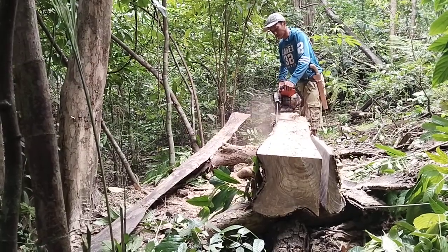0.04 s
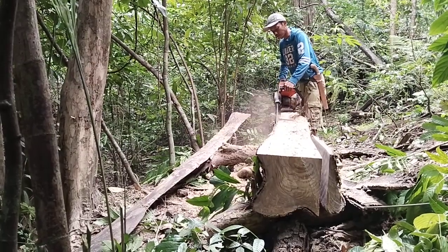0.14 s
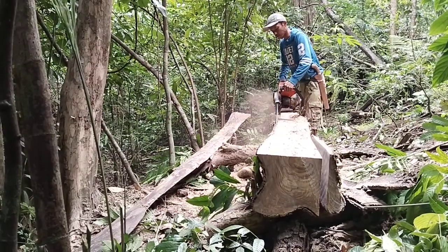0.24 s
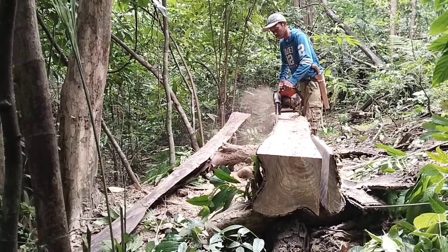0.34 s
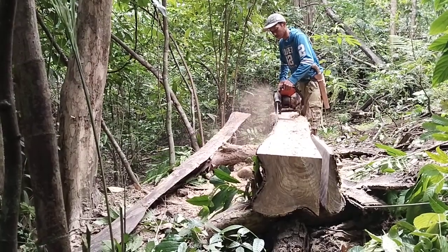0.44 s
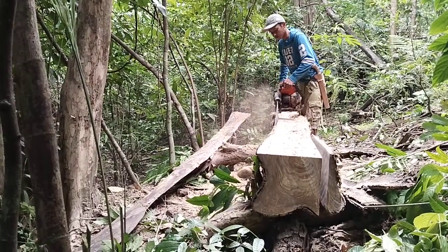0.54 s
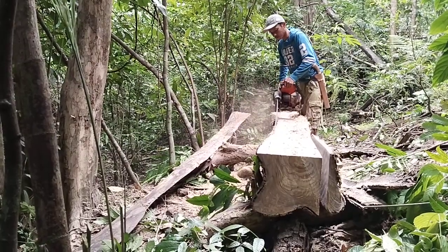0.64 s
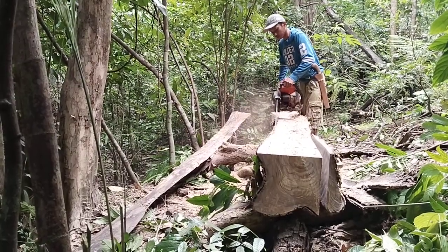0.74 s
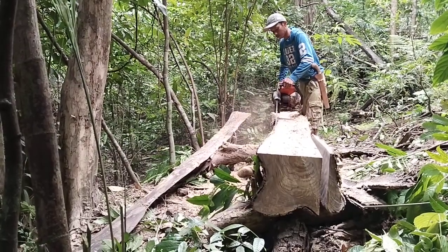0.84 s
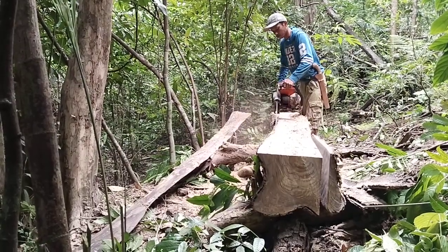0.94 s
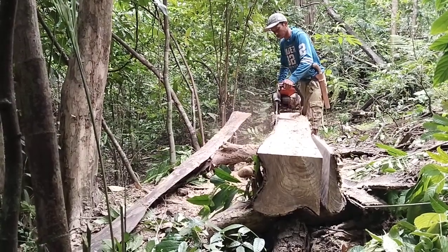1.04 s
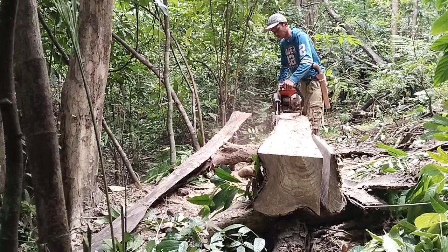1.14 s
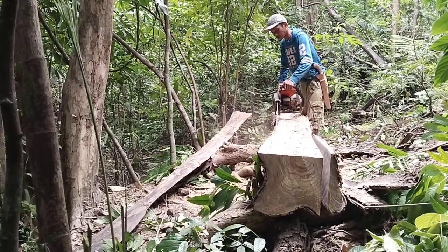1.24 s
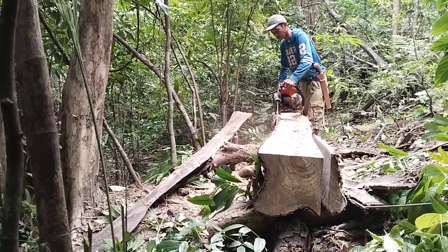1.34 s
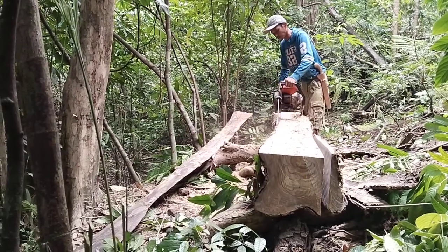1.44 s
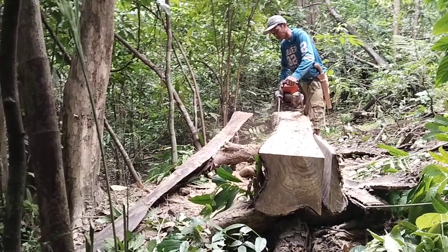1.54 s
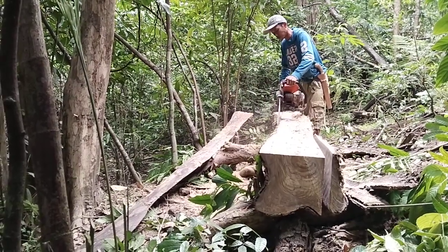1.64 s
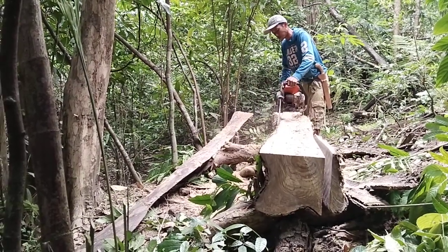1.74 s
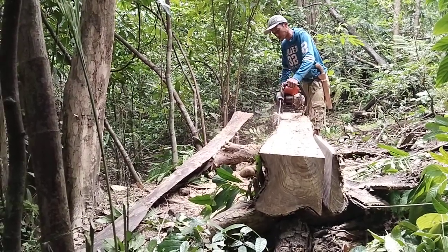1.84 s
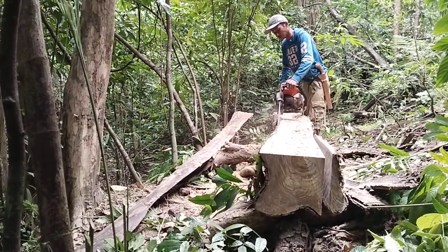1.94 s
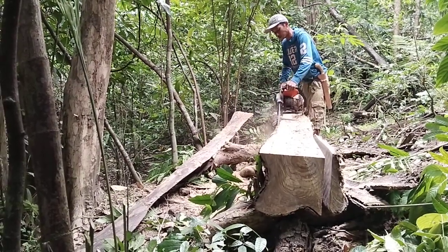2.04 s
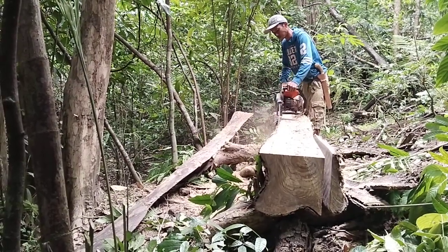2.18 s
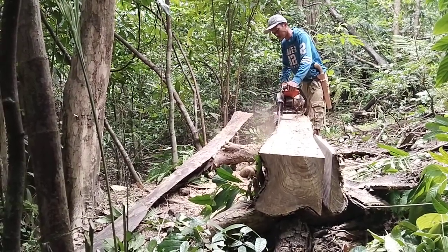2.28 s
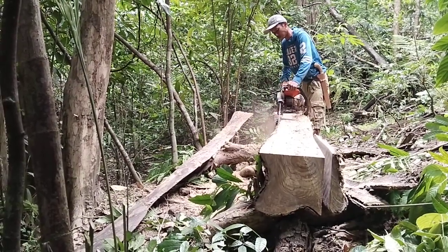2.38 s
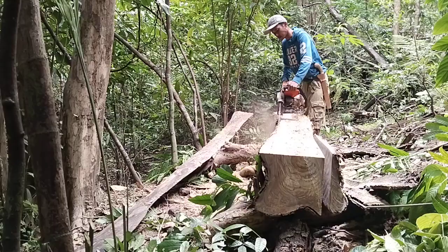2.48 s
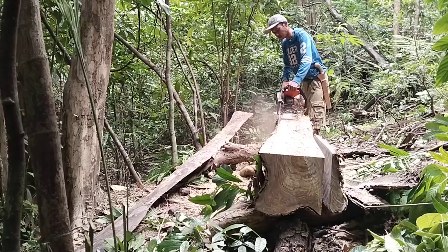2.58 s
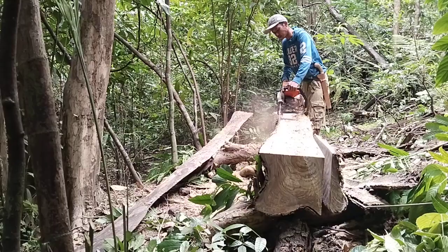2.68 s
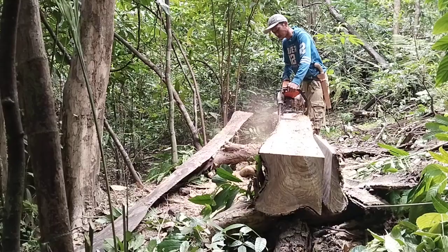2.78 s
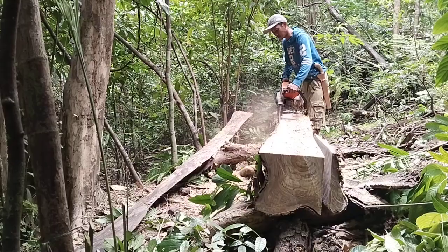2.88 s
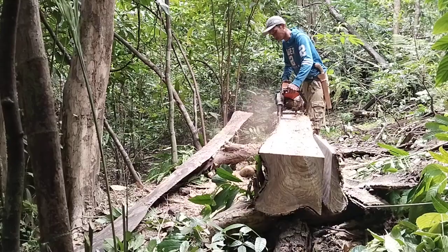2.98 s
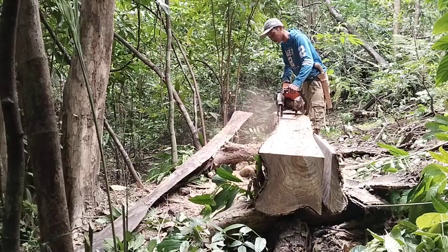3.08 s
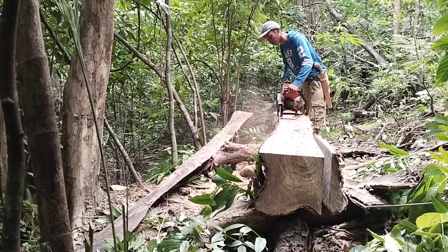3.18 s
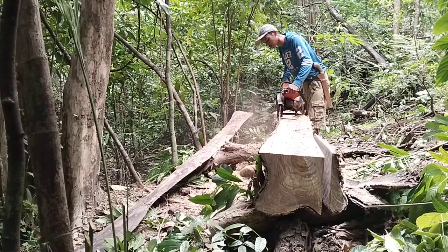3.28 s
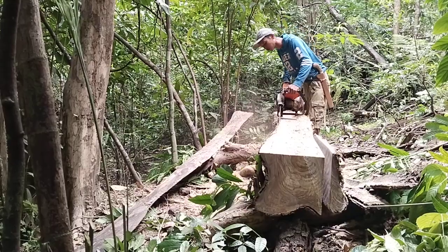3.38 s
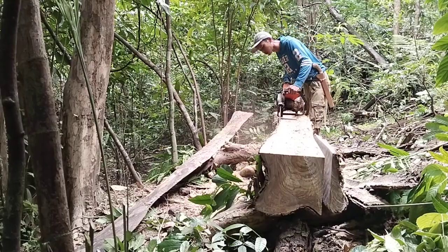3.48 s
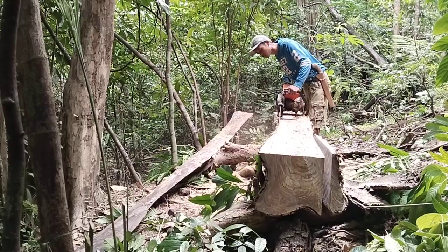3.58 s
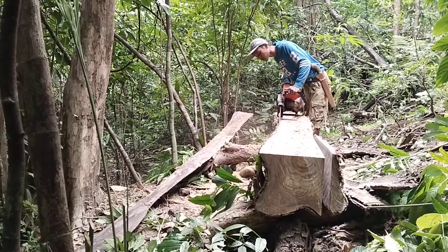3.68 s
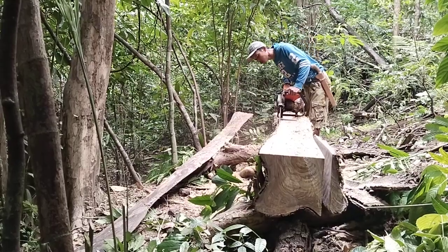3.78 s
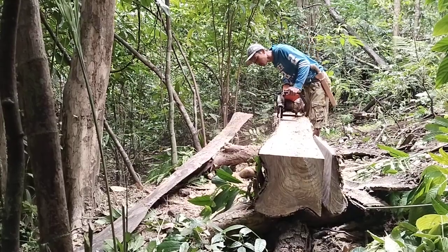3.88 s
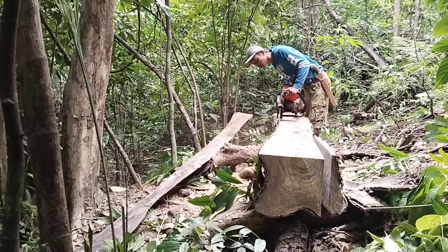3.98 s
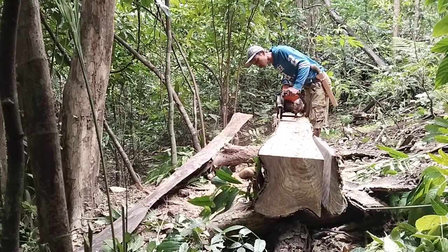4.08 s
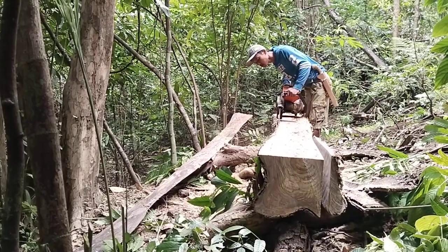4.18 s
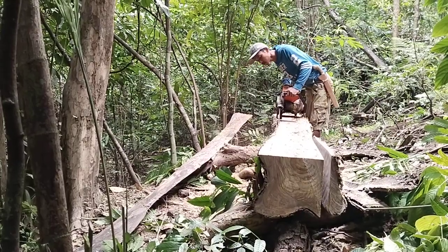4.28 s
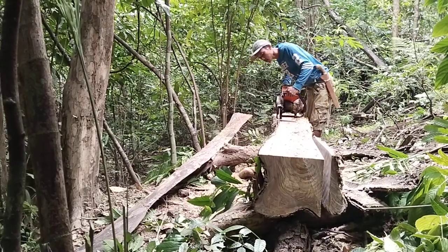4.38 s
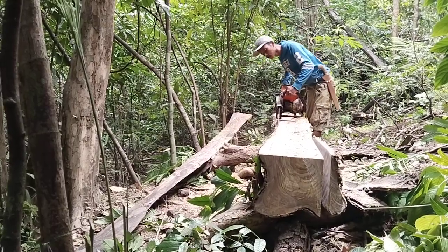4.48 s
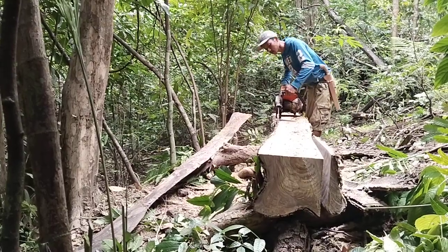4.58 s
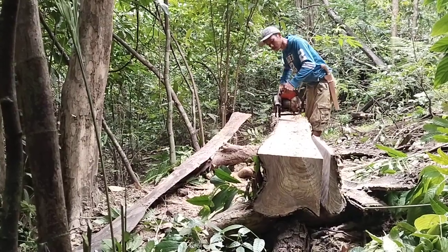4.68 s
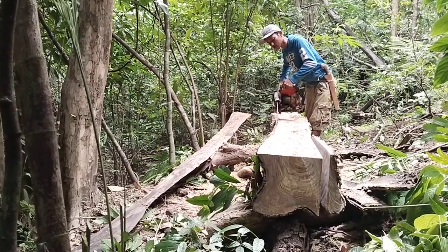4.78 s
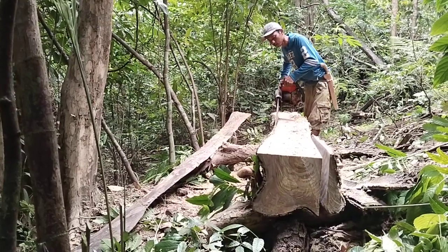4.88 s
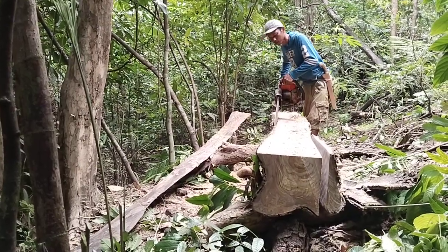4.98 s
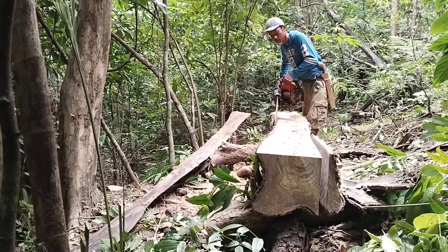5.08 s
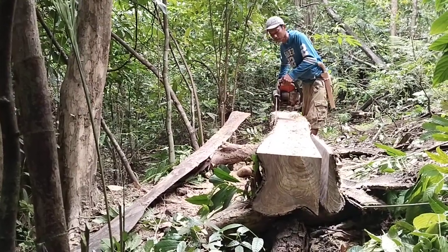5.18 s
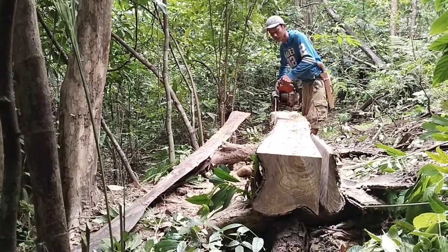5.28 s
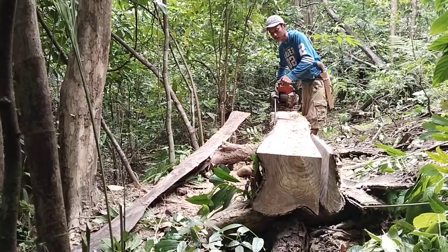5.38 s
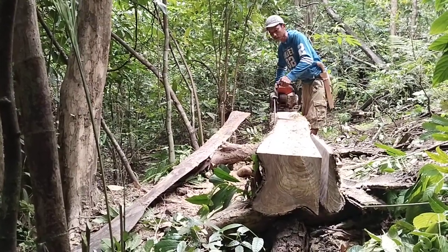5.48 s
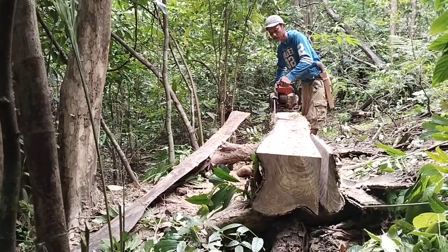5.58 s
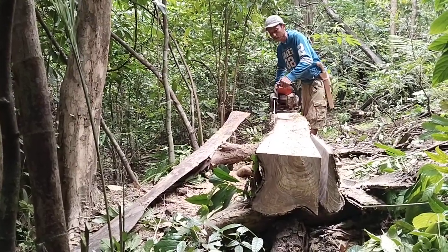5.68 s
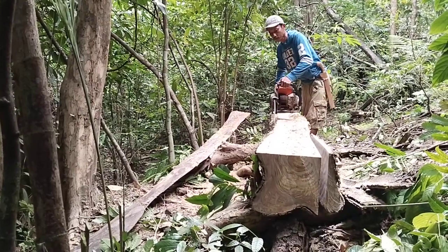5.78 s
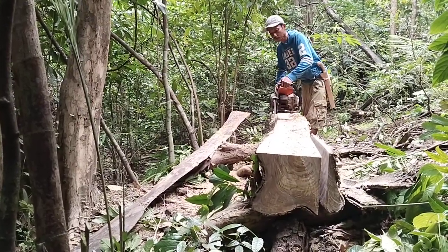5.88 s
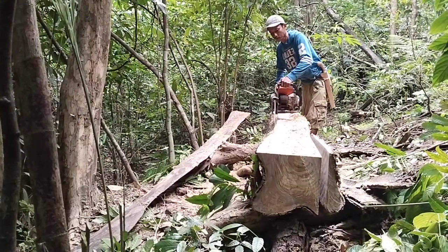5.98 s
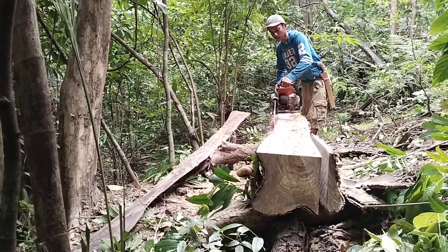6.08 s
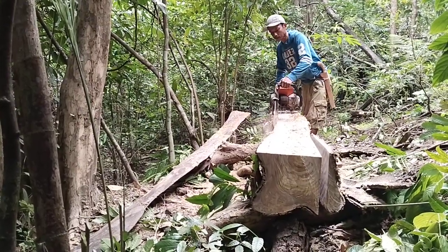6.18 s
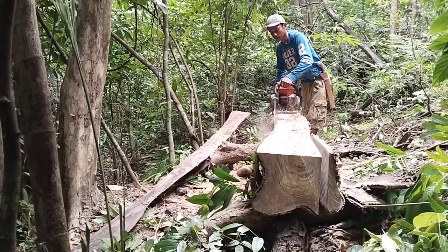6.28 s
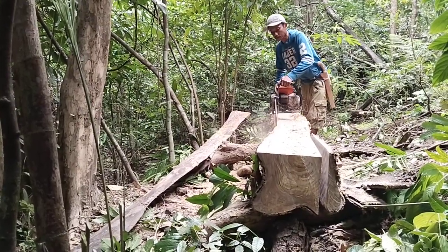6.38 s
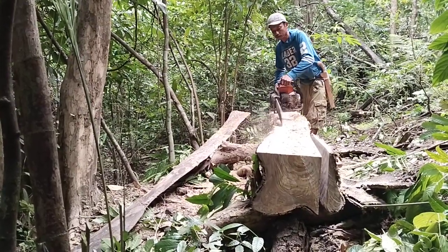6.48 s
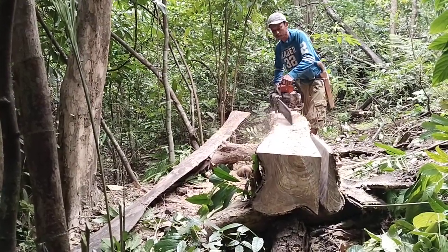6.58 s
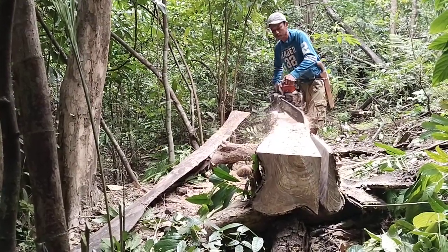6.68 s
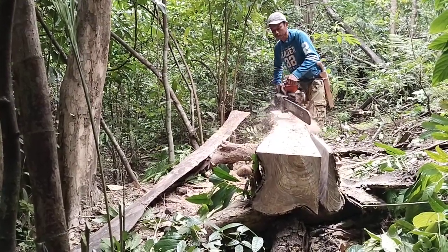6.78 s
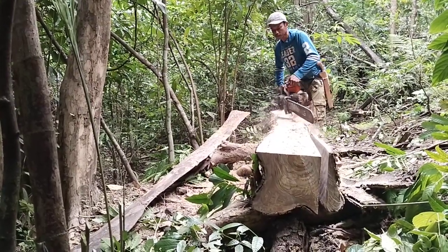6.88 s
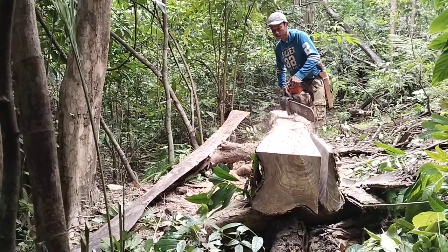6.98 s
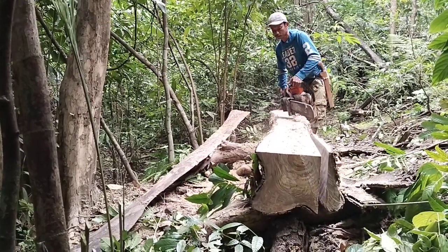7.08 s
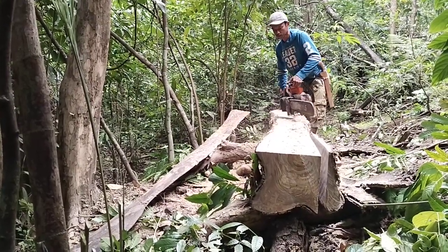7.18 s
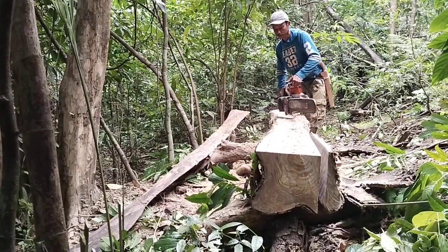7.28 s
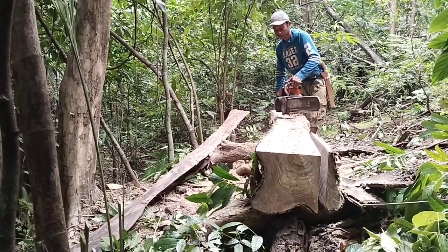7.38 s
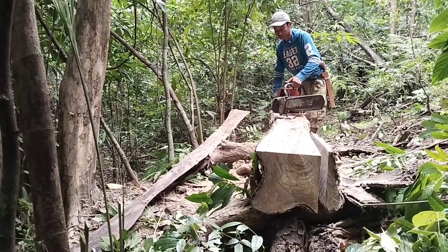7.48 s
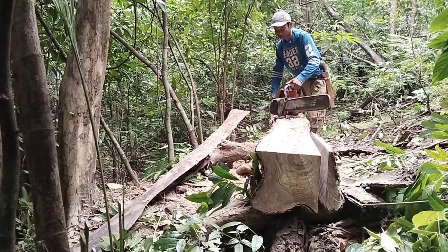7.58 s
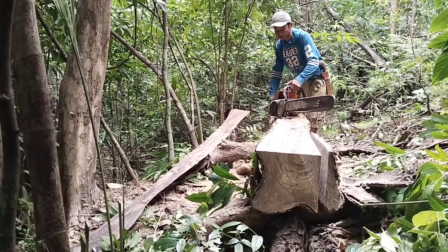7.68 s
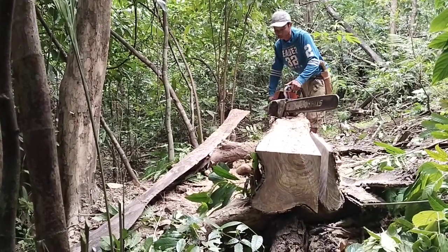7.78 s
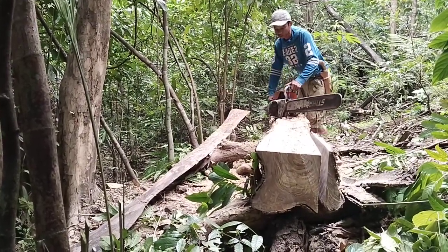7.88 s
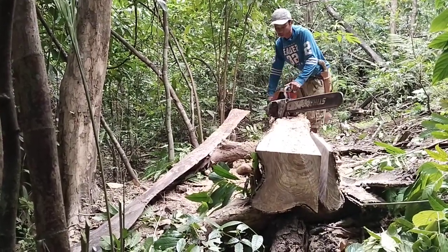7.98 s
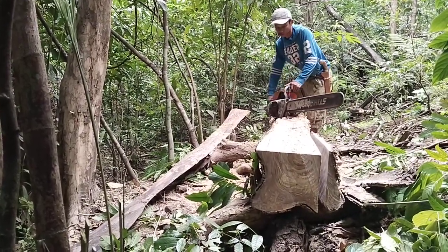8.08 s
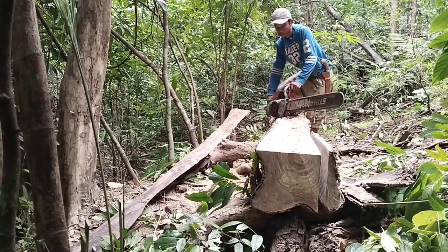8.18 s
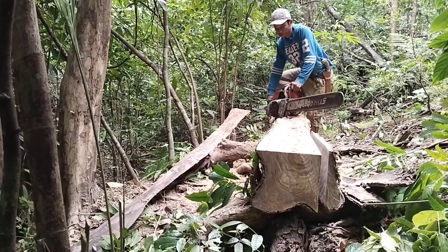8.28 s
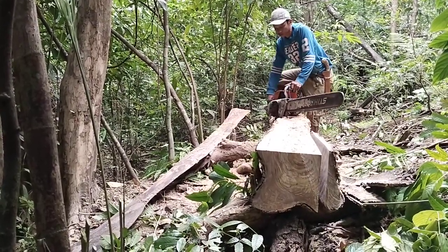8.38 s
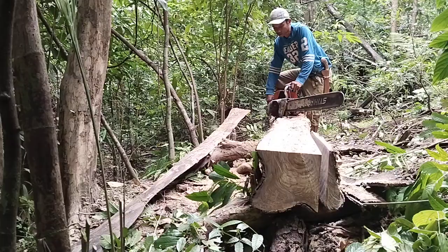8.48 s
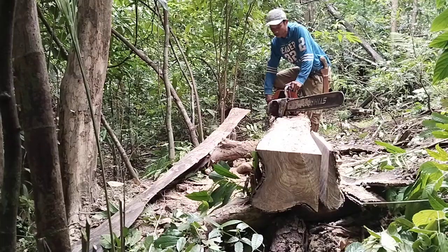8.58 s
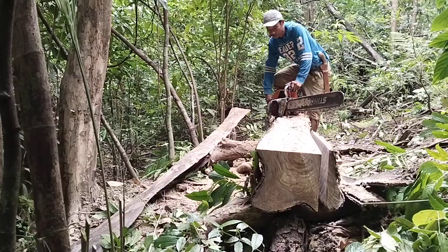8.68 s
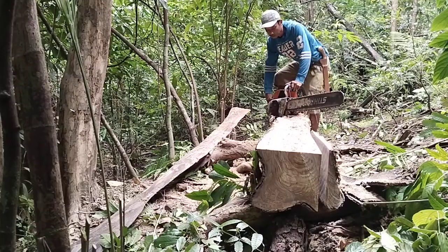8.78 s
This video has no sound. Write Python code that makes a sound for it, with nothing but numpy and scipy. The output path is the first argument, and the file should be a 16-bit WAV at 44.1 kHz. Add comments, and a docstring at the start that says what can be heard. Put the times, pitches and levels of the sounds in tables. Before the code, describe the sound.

A two-stroke chainsaw rips along a log in a forest, slows to a putter, revs briefly, then coasts down to idle.

```python
"""Chainsaw in a forest clearing

A two-stroke chainsaw rips a log lengthwise, a few metres away. Under throttle every turn of the
engine fires, or it stutters in single pops; off throttle it pumps softly and coasts down to a putter.
The muffler's whine sinks as the gas in it cools. The chain hisses through the wood and rings the bar
it runs on. At low speed loose parts rattle and the slack chain jingles. The trees add a short echo."""
import sys
import numpy as np
from scipy import signal
from scipy.io import wavfile
from scipy.ndimage import uniform_filter1d, map_coordinates

SR = 44100
rng = np.random.default_rng(int(sys.argv[2]) if len(sys.argv) > 2 else 0)


def output_pcm(signal):
    """Save a mono or channel-first signal as 16-bit PCM at the path in sys.argv[1].

    Samples are clipped to [-1, 1] before scaling.
    """
    pcm = np.clip(np.atleast_2d(signal).T, -1, 1) * 32767
    wavfile.write(sys.argv[1], SR, np.round(pcm).astype(np.int16))


N = 389844
TIME = np.arange(N) / SR
FULL_SPEED = 120  # turns a second; "pace" is the engine's speed divided by this


def exhaust(opens, burn, crack, pace, jitter_s=6e-6):
    """Each time the exhaust port opens, gas leaves: a blast if the fuel fired, a soft puff if not."""
    opens = opens + jitter_s * rng.standard_normal(len(opens))
    return blasts(opens, burn, crack, pace) + puffs(opens, np.clip(1 - burn, 0, 1), pace)


# the muffler's tone when a firing hits it: f/Hz, level/dB
BLAST_TONE = [(30, -14), (130, -12.5), (240, 7.5), (370, -10.5), (520, 7), (650, 15), (780, 24), (1080, 9),
              (1290, -14), (1600, 8.5), (1750, -2.5), (2450, -4), (3600, -42), (9000, -38.5)]
# the hard edge of a firing: f/Hz, level/dB
RASP_TONE = [(300, -23), (1250, -17), (1700, -4.5), (2000, -5), (2250, -25), (2480, 12), (2620, 8.5),
             (2780, 1), (3100, 12.5), (3330, 0.5), (3600, -35), (6000, -29)]
# the hiss of gas leaving the outlet: f/Hz, level/dB
JET_TONE = [(100, -31), (700, 4.5), (1300, 1), (2400, 10.5), (3200, -3.5), (3800, -54), (4700, -1),
            (5600, 6.5), (6700, 9.5), (8500, -3.5), (10500, -16)]
# the low boom of the dumped gas: f/Hz, level/dB
BOOM_TONE = [(25, -27), (60, -6), (100, 4), (145, -1.5), (230, 1.5), (350, -32), (1000, -87)]
def blasts(opens, burn, crack, pace, rasp_delay_s=0.001225, fresh_db=3.5, jet_db=-28, jet_s=0.0037):
    """Burnt gas bangs through the muffler; a run of firings heats it, which lifts the ring's pitch."""
    edge, gust, timing, strength = rng.standard_normal((4, len(opens)))
    slow = np.clip(.9 - pace, 0, .25)  # a slow engine fires less evenly
    opens = opens + 0.00013 * slow * timing
    burn = burn * gain_of(3.0 * slow * strength)
    heat = 1 + signal.lfilter([.12], [1, -.88], burn - 1)
    blast = strike(opens, burn, BLAST_TONE, ring_drift(opens) + 0.0045 * (heat - .8))
    # the bark is harder when the port opens fast, or a missed turn has swept the cylinder clean
    fresh = np.append(False, burn[:-1] < .5)
    bark = crack * burn ** 2 * pace ** 2.1 * gain_of(fresh * (fresh_db + edge))
    rasp = strike(opens + rasp_delay_s, bark, RASP_TONE, 1 + 0.097 * (heat - .9) - .3 * slow)
    # each blast spits swirling gas, most sharply after missed turns
    spit = crack * burn ** 0.95 * np.clip(1 - 0.64 * heat, 0, 1) * gain_of(0.55 * gust) / np.sqrt(pace)
    age = TIME[:SR // 20] / jet_s
    bursts = signal.oaconvolve(clicks(opens, spit), 2 * age * np.exp(1 - 2 * age))[:N]
    jet = bursts * evened(colour(rng.standard_normal(N), JET_TONE))
    # a slow turn holds the port open longer and dumps more gas
    boom = strike(opens, burn * pace ** -1.6, BOOM_TONE, np.ones(len(opens)))
    return blast - boom + rasp + gain_of(jet_db) * jet


# the muffler's tone when an unfired puff hits it: f/Hz, level/dB
PUFF_TONE = [(30, -48), (200, -30), (380, -22.5), (530, 2), (620, -4.5), (760, -2), (900, -33.5),
             (1080, -41), (1280, -42), (1850, -26), (3000, -37), (9000, -37.5)]
# the low thump after a puff: f/Hz, level/dB
THUMP_TONE = [(30, -39), (90, -9), (140, -0.5), (187, 7.5), (255, 1), (330, -16), (420, -15.5), (560, -33),
              (1500, -52.5)]
# the ring of the muffler's chamber: f/Hz, level/dB
CHAMBER_TONE = [(100, -48.5), (400, -22), (560, 3), (660, 10), (735, 18.5), (810, 16), (910, 1),
                (1070, 1.5), (1300, -19), (4000, -46.5)]
# gas pumped by an unfired turn, most at middling speed: speed/(turns a second), level/dB
PUMPED_GAS = [(25, -5.5), (30, -1.5), (44, -5), (56, 0.5), (69, 0.5), (84, -0.5), (110, 0), (135, -4.5)]
# gas drawn back by the piston: speed/(turns a second), lag/turns, level against the outflow/dB
RETURNING_GAS = [(24.3, 0.38, -2.5), (33.4, 0.38, 3.5), (48.3, 0.309, 2.5), (69, 0.269, -1.5),
                 (96, 0.32, -13.5), (141, 0.338, -5)]
def puffs(opens, share, pace, puff_delay_s=0.0014, thump_lag_turns=0.1):
    """Cold gas rings the chamber going out and again when drawn back; a round thump swells between."""
    uneven, back, drift, late = rng.standard_normal((4, len(opens)))
    rate, period = pace * FULL_SPEED, np.gradient(opens)
    sizes = share * gain_of(.06 * uneven / pace ** 2)  # slow turns are the least even
    tuning = 1 + 0.0073 * (pace - .6) + 0.0027 * drift
    chamber_tuning = tuning * ring_drift(opens)
    outflow = sizes * pace ** 0.99 * gain_of(read(PUMPED_GAS, rate))
    rates, lags, levels = np.transpose(RETURNING_GAS)
    lag = np.interp(rate, rates, lags) + 0.0035 * late
    backflow = outflow * gain_of(np.interp(rate, rates, levels) + 0.8 * back)
    ring = strike(opens, outflow, CHAMBER_TONE, chamber_tuning)
    ring += strike(opens + lag * period, backflow, CHAMBER_TONE, chamber_tuning)
    thump_times = opens + thump_lag_turns * period
    thump = strike(thump_times, sizes * (2 * pace) ** -.35, THUMP_TONE, tuning + 0.25 * (pace - .2))
    puff = strike(opens + puff_delay_s, sizes * (2 * pace) ** -.3, PUFF_TONE, tuning)
    return ring + thump + puff


# the pitch of the chamber's ring: t/s, pitch factor
CHAMBER_PITCH = [(0, 1.08), (.35, 1.026), (.7, 0.99), (2.2, 1.009), (3.2, 1.0), (3.6, 1.003), (4.4, 1.026),
                 (5.2, 1), (6.5, 0.97), (7.4, 1.005), (8.8, 0.98)]
def ring_drift(times):
    """The chamber's ring drifts in pitch as the saw is moved along the log."""
    return np.interp(times, *np.transpose(CHAMBER_PITCH))


# pulls on the throttle, in which every turn fires: start/s, end/s, level/dB, crack/dB
THROTTLE_PULLS = [(0, 0.307, 0.5, -2), (1.045, 1.183, 1.5, -1), (1.225, 1.286, -3, -5.5),
                  (1.363, 1.399, -0.5, -3), (1.476, 2.146, 0.73, 0.5), (2.355, 2.377, 1, -4),
                  (2.386, 2.787, 1.06, 0), (2.869, 2.96, 1.5, -2), (5.267, 5.356, -3, -1.5),
                  (5.49, 5.595, -4, -1.5), (5.664, 5.977, -0.5, -2), (6.018, 6.07, 0.5, 0),
                  (6.074, 6.177, 0.5, 1), (6.198, 6.312, 0.5, 2), (6.333, 6.384, -3, -8),
                  (6.41, 6.437, -8, -4)]
# single barks as the engine stutters or idles: t/s, level/dB, crack/dB
SINGLE_POPS = [(.976, 0.5, -7), (1.012, 1, 3.5), (1.035, 1.5, 1), (1.295, 2.5, 0), (1.316, 0, 1),
               (1.336, 1.5, -4), (1.356, 1.5, -2.5), (1.417, 2.5, -3.5), (1.437, 1, 0), (1.458, 0.5, 2),
               (2.17, 2, -3.5), (2.185, 1, -14), (4.833, -22, 1), (5.063, -16.5, -11), (5.234, -6, -4),
               (5.263, -14, -7), (5.416, -13, -10), (5.625, -8.5, -17), (5.684, -5, 4.5), (6.005, 0.5, 1.5),
               (6.184, -4.5, 10.5), (6.206, -1, 4), (6.323, 0, -5.5), (6.363, -2, -6), (6.426, -5.5, -6),
               (8.639, -21, -4)]
def combustion(opens, sag_db=-1.5, dregs_db=-3, dregs_s=0.0715, long_pull_s=.37, scatter_db=.35):
    """How strongly the fuel burns in each turn (zero if it does not light) and how sharply it cracks."""
    burn, dregs, crack_db = np.zeros((3, len(opens)))
    for start, end, db, sharp_db in THROTTLE_PULLS:
        lit = (opens >= start) & (opens < end)
        crack_db[lit] = sharp_db
        burn[lit] = gain_of(db + sag_db * (opens[lit] - start) / (end - start))
        # after a long pull the last of the fuel burns on weakly
        last_fuel = gain_of(db + sag_db + dregs_db) * min(1, (end - start) / long_pull_s) ** 2
        dregs += (opens >= end) * last_fuel * np.exp(-abs(opens - end) / dregs_s)
    burn = np.maximum(burn, dregs) * gain_of(scatter_db * rng.standard_normal(len(opens)))
    for s, db, sharp_db in SINGLE_POPS:
        turn = np.argmin(abs(opens - s))
        burn[turn], crack_db[turn] = gain_of(db), sharp_db
    return burn, gain_of(crack_db)


# how fast the engine spins: t/s, speed/(turns a second)
ENGINE_SPEED = [(0.0, 131.36), (0.32, 143.23), (0.63, 108.13), (0.99, 83.19), (1.16, 100.16), (1.25, 97.22),
                (1.54, 100.52), (1.7, 113.1), (1.85, 121.96), (2.01, 129.83), (2.18, 131.82),
                (2.37, 109.08), (2.57, 121.01), (2.71, 129.46), (2.82, 128.11), (2.85, 122.33),
                (2.96, 127.42), (3.01, 115.66), (3.58, 74.89), (3.7, 69.35), (4.79, 31.34), (5.21, 28.69),
                (5.35, 51.13), (5.43, 45.69), (5.67, 52.02), (5.77, 65.43), (6.34, 100.36), (6.76, 72.58),
                (8.14, 29.09), (8.84, 24.84)]
def speed():
    """Turns a second at each moment; the flywheel's weight rounds off the changes."""
    log_speed = curve([(s, np.log(rate)) for s, rate in ENGINE_SPEED])
    return uniform_filter1d(np.exp(log_speed), size=2400)


# the muffler's high ring with cold gas in it: f/Hz, level/dB
WHINE_TONE = [(900, -27.5), (1350, -26), (1600, 4), (1720, 6), (1835, 17), (2000, -8.5), (2300, 1.5),
              (2600, -9.5), (4000, -40.5)]
# the whine sets in above idle: speed/(turns a second), level/dB
WHINE_LEVEL = [(28, -28.5), (44, -30), (55, -18.5), (66, -8), (88, -7.5), (135, -14)]
# the unchanging tone that the outlet gives the whine: f/Hz, level/dB
OUTLET_TONE = [(1000, -6), (1450, 0), (1610, 3), (1700, -2), (1850, 0), (2060, -1), (2260, 4), (2480, 4),
               (2850, -3), (3150, -1), (3400, -12), (3700, -35)]
def whine(opens, burn, pace, cooling_s=0.04, hot_pace=.85, hot_rise=0.48, eddy_count=3):
    """Gas rings the muffler's high note once a turn; it climbs as the gas heats and sinks as it cools."""
    keep = np.exp(-1 / (cooling_s * SR))
    heating = np.interp(TIME, opens, np.minimum(burn * (pace / hot_pace) ** 4, 1))
    heat = heating[0] + signal.lfilter([1 - keep], [1, -keep], heating - heating[0])
    tuning, period = 1 + hot_rise * np.interp(opens, TIME, heat), np.gradient(opens)
    flow = gain_of(read(WHINE_LEVEL, pace * FULL_SPEED) - 9 * burn)
    # stray swirls of gas ring it at random moments too
    delays, sizes = rng.random((eddy_count, len(opens))), rng.standard_normal((eddy_count, len(opens)))
    eddies = sum(strike(opens + late * period, flow * size * gain_of(-14 + 9 * burn), WHINE_TONE, tuning)
                 for late, size in zip(delays, sizes))
    # a firing rings it early, an unfired turn only as the piston returns
    lag = .55 * (1 - .6 * np.minimum(burn, 1))
    return colour(strike(opens + lag * period, flow, WHINE_TONE, tuning) + eddies, OUTLET_TONE)


# the chain's hiss: f/Hz, level/dB
CHAIN_TONE = [(40, -16), (200, -10), (400, -7), (800, 17), (1250, 4.5), (1600, 9.5), (2400, 10.5),
              (2900, 2), (4200, 5), (5500, 6.5), (7000, 5.5), (8600, 7.5), (9600, -3.5), (10600, -24.5)]
# the notes of bar and chain, and a broad band near 6.6 kHz: f/Hz, width/Hz, level cutting/dB, level running
# free/dB
BAR_NOTES = [(3352, 73, 1.5, -6), (4245, 41, -16, -7), (5380, 55, 6, -14), (5550, 50, 6.5, -5),
             (6700, 480, -8.5, -1), (6540, 110, 1, -8), (8210, 86, -1, -6)]
# how hard the bar is pressed into the wood: t/s, pressure from 0 to 1
CUT_PRESSURE = [(0, 0.78), (.45, 0.93), (.68, 1), (.88, 0.4), (1.3, 0.27), (1.7, 0.46), (2.3, 0.8),
                (2.58, 0.48), (3.1, 0.92), (3.45, 0.14), (4.2, 0.23)]
def chain(turns, hiss_db=9.5, bar_db=-3, throb=0.093, waver_db=2.0):
    """The teeth scrape the wood in uneven bites, tugged once a turn; they also ring the bar."""
    bites = gain_of(wander(35)) * (1 + throb * np.cos(2 * np.pi * turns))
    sound = gain_of(hiss_db) * evened(colour(bites * rng.standard_normal(N), CHAIN_TONE))
    for hz, width, cutting_db, free_db in BAR_NOTES:
        pole = np.exp((-np.pi * width + 2j * np.pi * hz) / SR)  # makes a filter that rings at hz
        ring = signal.lfilter([1], [1, -pole], bites * rng.standard_normal(N)).real
        note_db = bar_db + free_db + curve(CUT_PRESSURE) * (cutting_db - free_db)
        sound += evened(ring) * gain_of(note_db + waver_db * wander(10))
    return sound


def chain_level(opens, burn, pace, free_db=-51.5, doubling_db=7.5, cut_db=6, jerk_db=-50.5, jerk_s=0.016):
    """The chain is louder the faster it runs and the harder it cuts; firings jerk it most when slow."""
    running = gain_of(free_db + doubling_db * np.log2(speed() / FULL_SPEED) + cut_db * curve(CUT_PRESSURE))
    jerks = (gain_of(jerk_db) * burn / (2 * pace) ** 1.4) ** 2
    shaking = signal.lfilter([1], [1, -np.exp(-1 / (jerk_s * SR))], clicks(opens, jerks))
    return np.sqrt(running ** 2 + shaking)


# the knock of piston and clutch: f/Hz, level/dB
RATTLE_TONE = [(600, -17), (1300, -6.5), (1560, 11.5), (1700, 5), (1880, 17.5), (2100, -3.5), (2350, -1.5),
               (2900, -6.5), (3300, 5), (3700, -3), (4300, -0.5), (5000, -4.5), (5900, 1.5), (7000, -4.5),
               (8400, -9.5), (9500, -7), (10600, -24)]
# the rattle is loudest just above idle: speed/(turns a second), level/dB
RATTLE_LEVEL = [(25, -62.5), (30, -56), (42, -53.5), (55, -73), (75, -68)]
def rattle(turns):
    """At low speed each squeeze of the gas brakes the engine, and loose parts knock in a short burst."""
    knocks = compression(turns) * gain_of(1.5 * wander(30)) * rng.standard_normal(N)
    return gain_of(read(RATTLE_LEVEL, speed())) * evened(colour(knocks, RATTLE_TONE))


def compression(turns, lead_turns=0.17, sharpness=4.6):
    """Rises to 1 once a turn, as the piston squeezes the gas."""
    return np.exp(sharpness * (np.cos(2 * np.pi * (turns + lead_turns)) - 1))


# the notes of the loose links: f/Hz, time to fade by 60 dB/s, level/dB,
# speed that shakes them most/(turns a second), spread around that speed/(turns a second)
LINK_NOTES = [(5910, 0.029, 10, 35, 4.4), (6500, 0.013, 12, 35.7, 4.2), (6950, 0.082, 2, 25.6, 2.4),
              (7160, 0.009, 3.5, 34, 12), (8280, 0.024, 7, 32, 6.4), (10440, 0.012, -3, 28, 2.2)]
def jingle(turns, peak_ticks_per_s=1200, shake=0.63, swing_db=4.5, level_db=-59.5):
    """At low speed the clutch lets go: slack links tick against the bar, shaken once a turn."""
    t, rate = TIME[:SR // 8], speed()
    chance = peak_ticks_per_s / SR * (1 - shake + shake * compression(turns))
    ticks = (rng.random(N) < chance) * rng.standard_normal((len(LINK_NOTES), N))
    sound = np.zeros(N)
    for tick, (hz, fade_s, db, best, spread) in zip(ticks, LINK_NOTES):
        hits = tick * gain_of(swing_db * wander(5.6)) * np.exp(-((rate - best) / spread) ** 2 / 2)
        ring = gain_of(db - 60 * t / fade_s) * np.sin(2 * np.pi * hz * t)
        sound += signal.oaconvolve(hits, ring)[:N]
    muffling_db = curve([(6.5, -3), (8.0, 0)])  # the cut muffles it until the bar is lifted out
    return gain_of(level_db + muffling_db) * evened(sound)


# slaps of the chain on the bar: t/s, level/dB
SLAP_HITS = [(7.801, -39), (7.875, -46), (7.935, -33.5), (7.995, -38), (8.024, -38), (8.055, -39),
             (8.125, -38), (8.191, -42), (8.224, -41), (8.26, -38), (8.295, -38), (8.329, -42)]
# the notes of one slap: f/Hz, time to fade by 60 dB/s, level/dB
SLAP_NOTES = [(5940, 0.03, -12), (6100, 0.024, -5), (6450, .015, -5.5), (7150, 0.024, -6),
              (8300, 0.032, -17)]
def slaps(detune=0.018):
    """The slack chain swings against the bar; each slap rings a little differently."""
    t, out = TIME[:SR // 12], np.zeros(N + SR)
    for s, db in SLAP_HITS:
        for hz, fade_s, note_db in SLAP_NOTES:
            pitch = hz * (1 + detune * rng.standard_normal())
            ring = gain_of(db + note_db - 60 * t / fade_s) * np.sin(2 * np.pi * pitch * t)
            out[round(s * SR):][:len(t)] += ring
    return out[:N]


# how long the echo lasts: f/Hz, time to fade by 60 dB/s
ECHO_FADE = [(100, 0.5), (800, 0.19), (3000, 0.17), (10000, 0.06)]
# the echo's tone, its middle soaked up by the undergrowth: f/Hz, level/dB
ECHO_TONE = [(100, -18), (280, -4), (750, -6), (1500, -2), (3000, 0), (10000, -2)]
def forest(x, echoes_per_s=2000, first_echo_s=.008):
    """Sound bounces off trunks and leaves; the high notes die away first."""
    echoes = rng.standard_normal(SR) * (rng.random(SR) < echoes_per_s / SR) * (TIME[:SR] > first_echo_s)
    hz, t, bands = signal.stft(echoes, SR, nperseg=256)
    fade = gain_of(-60 * t / read(ECHO_FADE, hz)[:, None])
    tail = signal.istft(bands * fade, SR, nperseg=256)[1]
    return signal.fftconvolve(colour(x, ECHO_TONE), tail / np.linalg.norm(tail))[:N]


def gain_of(db):
    """Turns decibels into a number to multiply by."""
    return 10 ** (np.asarray(db) / 20)


def evened(x):
    """Scales a signal to an average (rms) level of 1."""
    return x / np.sqrt(np.mean(x ** 2) + 1e-20)


def curve(rows):
    """Joins (time, value) rows by straight lines."""
    return np.interp(TIME, *np.transpose(rows))


def read(points, hz):
    """Looks up a table between its rows, on a log-frequency scale."""
    f, value = np.transpose(points)
    return np.interp(np.log(hz + 1), np.log(f + 1), value)


def colour(x, tone):
    """Filters a signal to give it a tone."""
    return signal.oaconvolve(x, response(tone))[:N]


def wander(rate):
    """A random drift that takes a new turn rate times a second."""
    return evened(np.interp(TIME * rate, np.arange(N // 8), rng.standard_normal(N // 8)))


def clicks(times, sizes):
    """One click at each time."""
    return np.bincount(np.clip(times * SR, 0, N).astype(int), sizes, N + 1)[:N]


def response(tone):
    """The short ring that one click makes in something with this tone."""
    log_gain = np.log(gain_of(read(tone, abs(np.fft.fftfreq(8192, 1 / SR)))))
    return np.fft.ifft(np.exp(np.conj(signal.hilbert(log_gain)))).real[:1500]


def strike(times, sizes, tone, tuning):
    """Plays a tone's ring at each exact time; tuning multiplies its pitch."""
    ring = response(tone)
    starts = times[:, None] * SR
    places = np.ceil(starts).astype(int) + np.arange(len(ring))
    shapes = map_coordinates(ring, [(places - starts) * tuning[:, None]], order=3)
    return np.bincount(np.clip(places, 0, N).ravel(), (sizes[:, None] * shapes).ravel(), N + 1)[:N]


def scene(echo_db=-10.5):
    """The saw and its echo among the trees."""
    turns = .33 + np.cumsum(speed()) / SR
    # the times at which the exhaust port opens: once every whole turn
    opens = np.interp(np.arange(np.ceil(turns[0]), turns[-1]), turns, TIME)
    pace = np.interp(opens, TIME, speed()) / FULL_SPEED
    burn, crack = combustion(opens)
    saw = exhaust(opens, burn, crack, pace) + whine(opens, burn, pace)
    saw += chain_level(opens, burn, pace) * chain(turns)
    saw += rattle(turns) + jingle(turns) + slaps()
    return (saw + gain_of(echo_db) * forest(saw))[None]


def record(dry, top_hz=10700):
    """Cuts off the highest treble."""
    low_pass = signal.firwin(511, top_hz, window=("kaiser", 9), fs=SR)
    return signal.oaconvolve(dry, low_pass[None], "same")


dry = scene()
out = record(dry)
output_pcm(out)
```